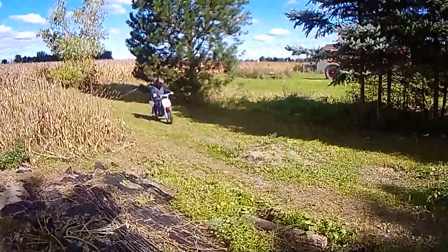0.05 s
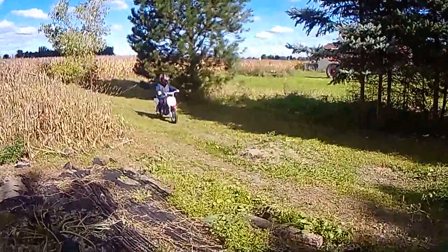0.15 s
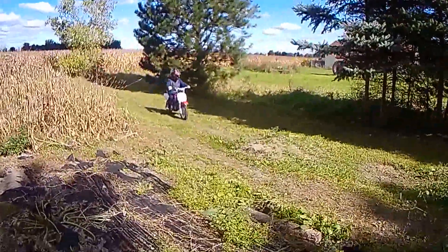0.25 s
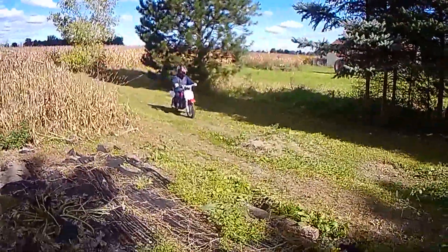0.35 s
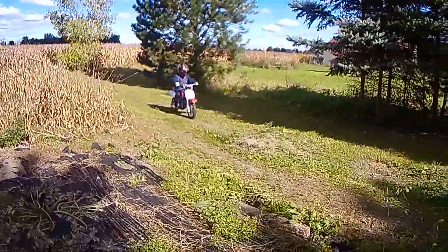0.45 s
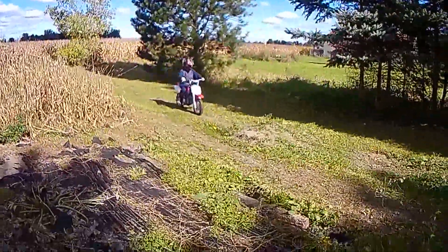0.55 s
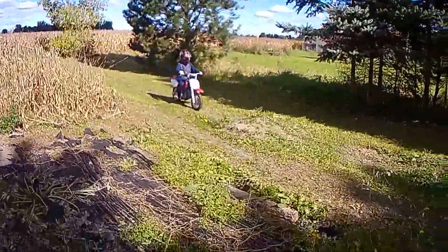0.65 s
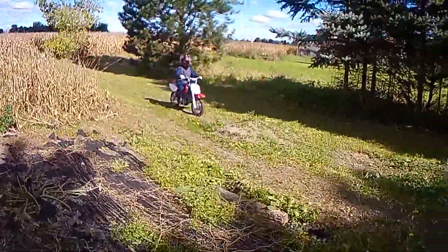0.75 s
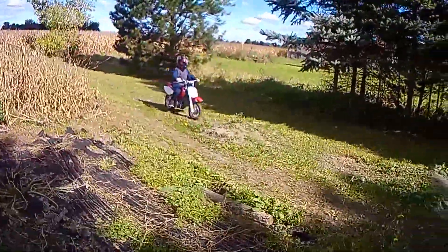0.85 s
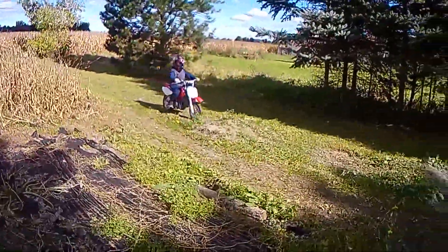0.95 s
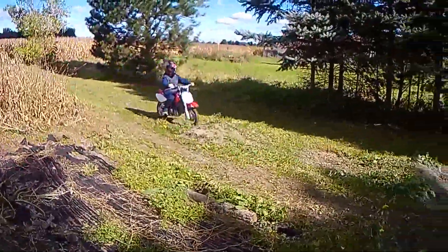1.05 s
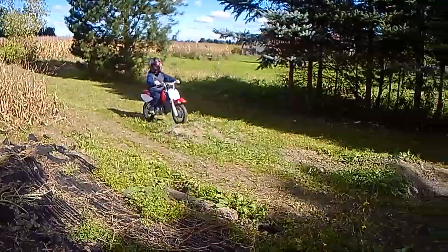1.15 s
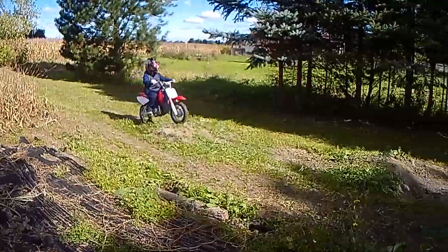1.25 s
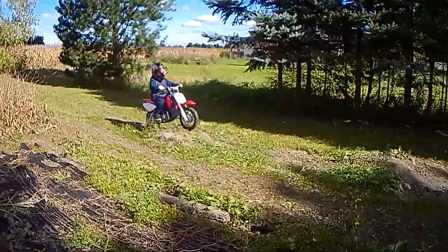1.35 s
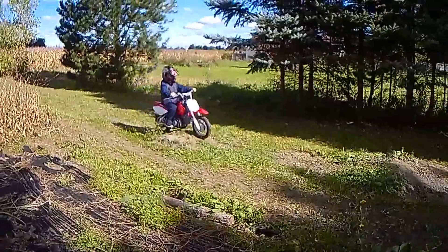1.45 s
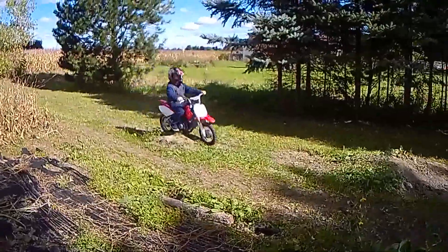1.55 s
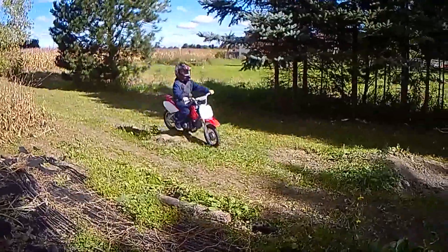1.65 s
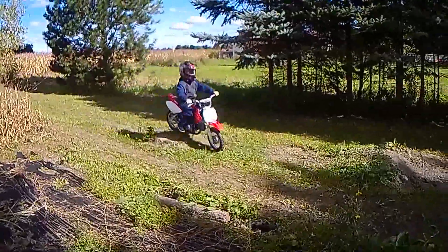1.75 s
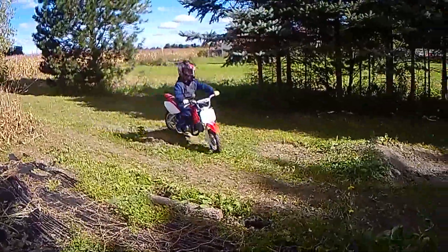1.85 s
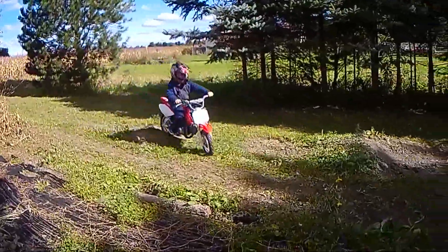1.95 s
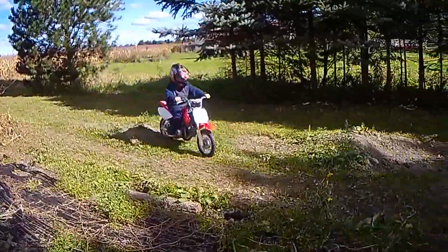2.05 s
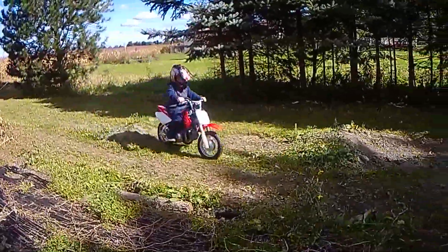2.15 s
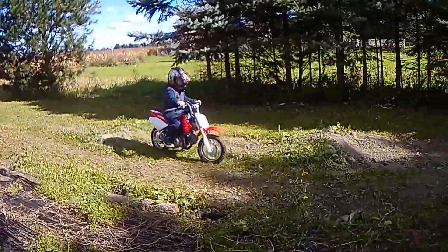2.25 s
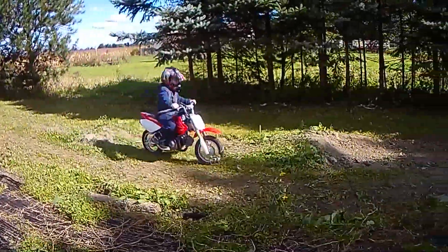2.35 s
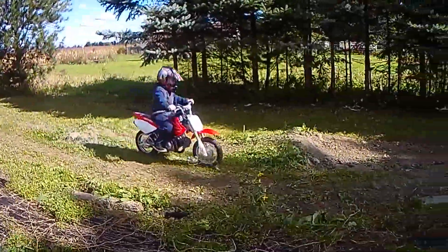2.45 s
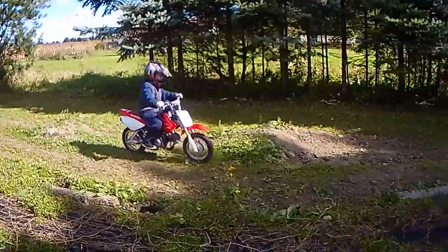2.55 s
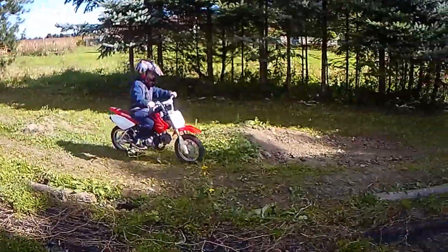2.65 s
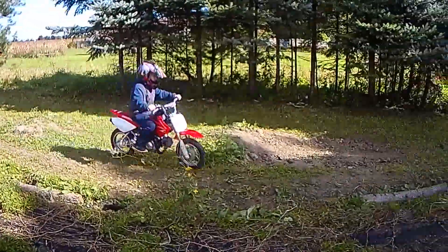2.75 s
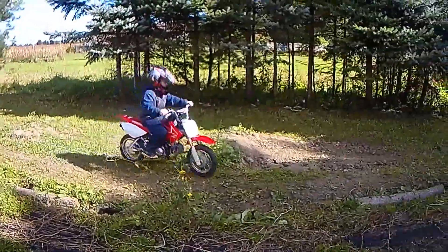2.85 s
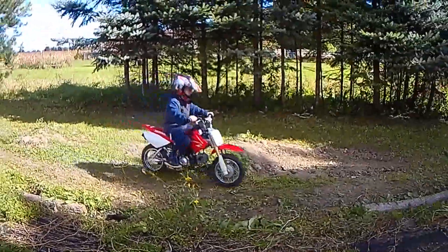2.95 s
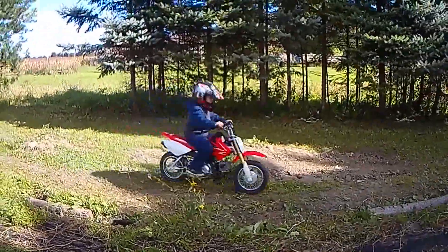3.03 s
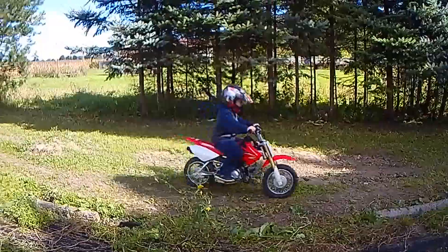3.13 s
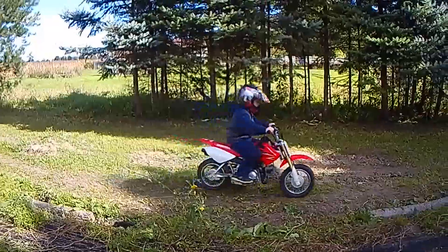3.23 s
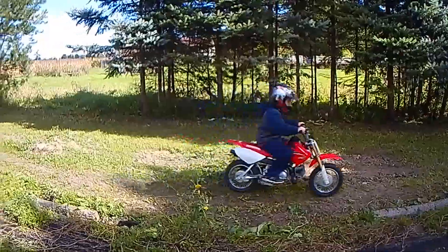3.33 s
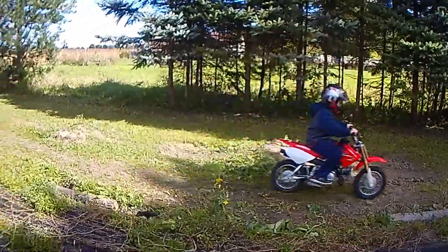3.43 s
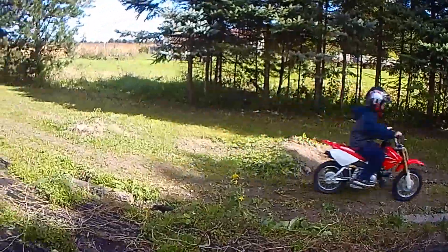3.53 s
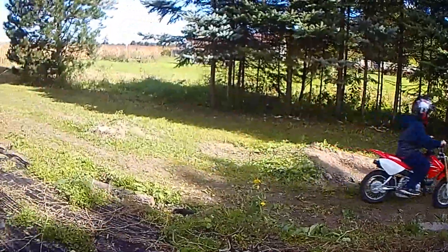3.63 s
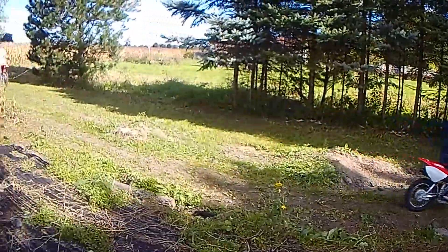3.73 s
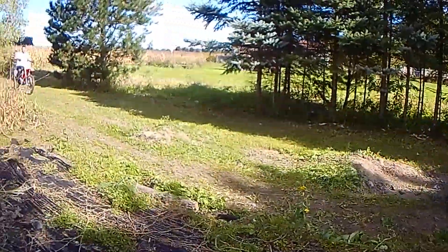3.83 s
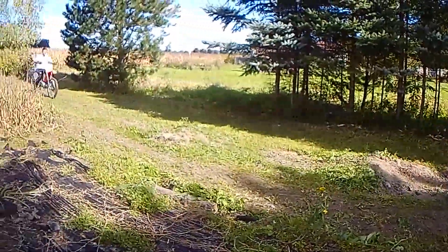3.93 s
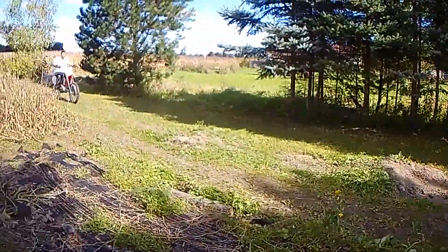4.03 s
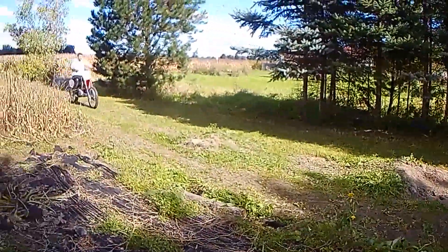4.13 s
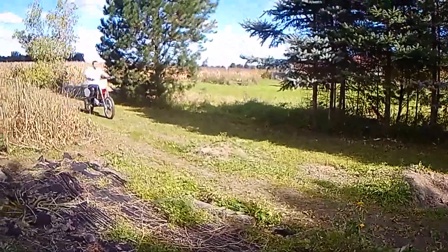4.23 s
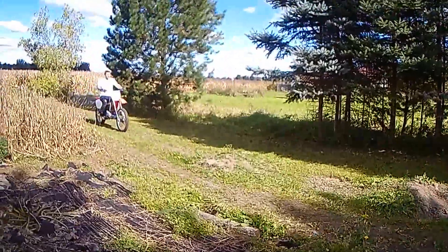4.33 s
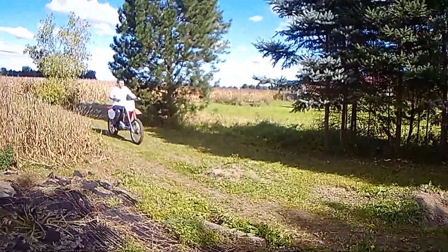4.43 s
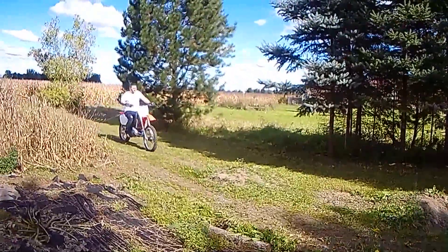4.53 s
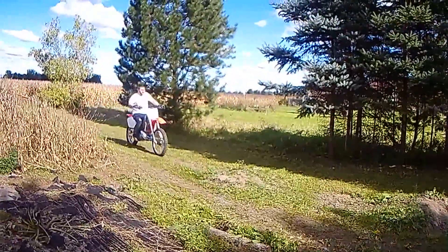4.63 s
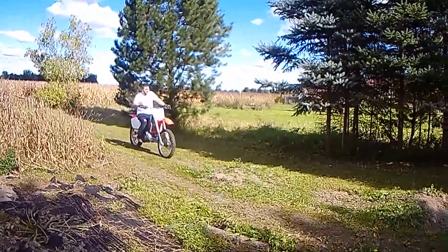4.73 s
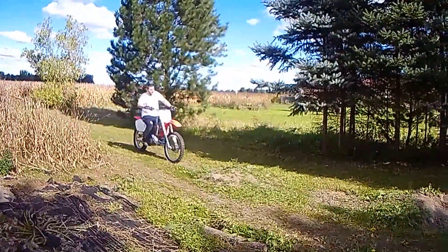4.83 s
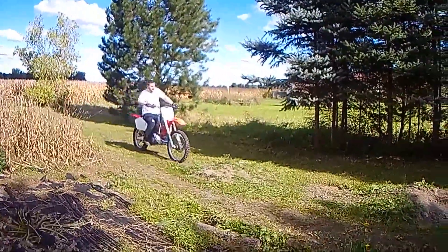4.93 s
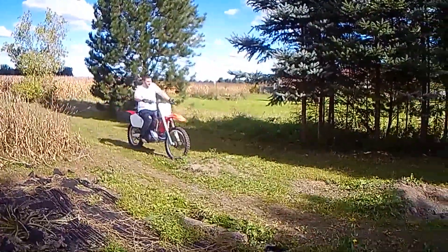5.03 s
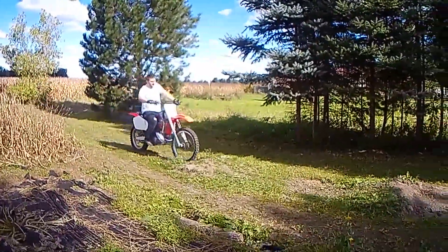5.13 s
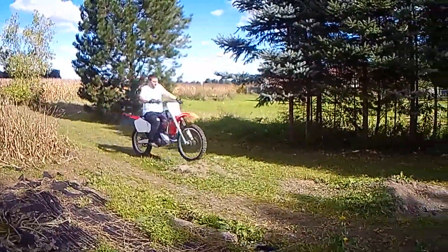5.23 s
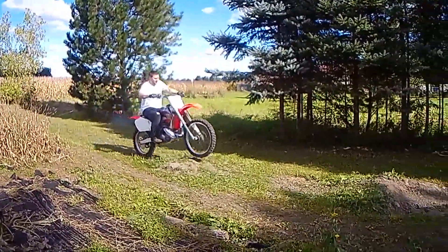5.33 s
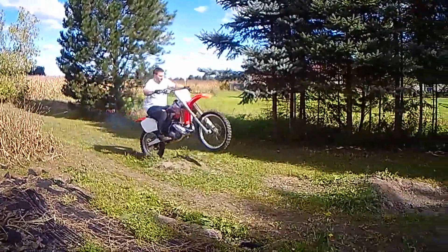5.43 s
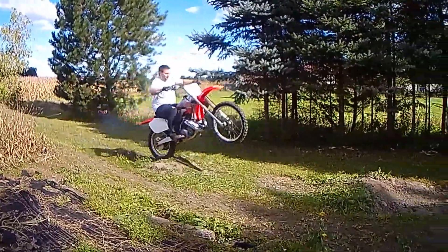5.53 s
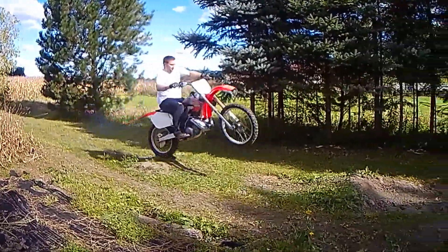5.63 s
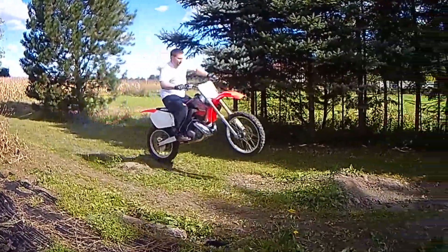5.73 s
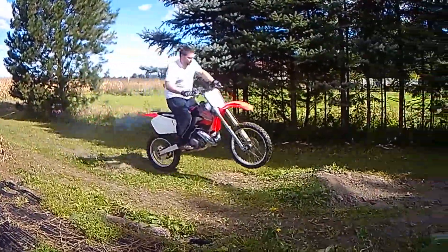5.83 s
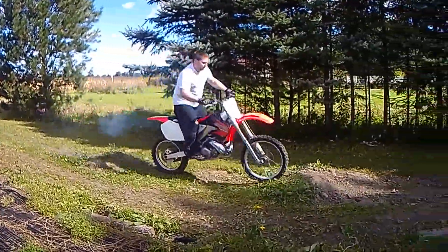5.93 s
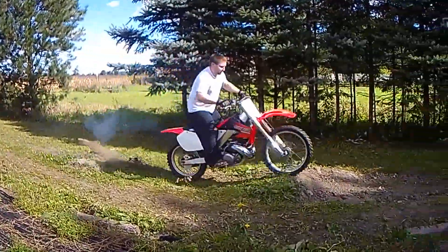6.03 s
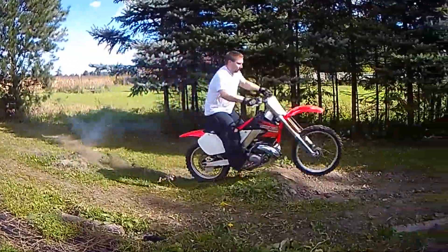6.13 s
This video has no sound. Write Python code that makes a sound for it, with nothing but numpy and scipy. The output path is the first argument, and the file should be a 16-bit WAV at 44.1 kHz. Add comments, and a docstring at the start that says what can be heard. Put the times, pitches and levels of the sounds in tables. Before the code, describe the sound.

Outdoors on grass, a distant two-stroke dirt bike burbles and sinks in pitch while a small four-stroke putters closer. Light ticks touch the microphone housing early on. The small bike passes with a soft low putt; then the two-stroke revs, approaches and gives two loud, ringing, raspy blips with a brief ragged drop between. A small camera microphone adds faint hiss and slight breeze; trees scatter the sound.

```python
"""A big two-stroke dirt bike burbles, comes close and is blipped twice, while a little four-stroke putters past.
Each engine is a train of impulses, one per firing, filtered into exhaust notes and gating bursts of gas noise.
Trees scatter both bikes, a finger ticks on the housing of a small camera, and a faint breeze blows on it.
The camera adds hiss, cuts one narrow and two broad notches and drops the extreme treble."""
import sys
import numpy as np
from scipy import signal
from scipy.fft import rfft, irfft, next_fast_len
from scipy.io import wavfile
from scipy.ndimage import uniform_filter1d, map_coordinates

SR = 44100
rng = np.random.default_rng(int(sys.argv[2]) if len(sys.argv) > 2 else 0)


def dump_mix(stems):
    """Bounce the given channels to the path in sys.argv[1] as a 16-bit WAV at rate SR."""
    frames = np.atleast_2d(stems).T  # one column per channel
    limited = np.clip(frames, -1, 1)  # hard clip at full scale
    pcm = np.round(limited * 32767).astype(np.int16)
    wavfile.write(sys.argv[1], SR, pcm)


N = 272538
T = np.arange(N) / SR  # time of each sample, s

# Big bike's engine speed. Each row: time in seconds, firings per second.
BIG_FIRING_RATE = [(0, 46.9), (.2, 51.2), (.6, 45.5), (1, 40), (1.6, 37), (2.3, 34.5), (3.1, 38), (3.3, 43),
                   (3.6, 65), (3.7, 54), (3.95, 56.5), (4.5, 48), (4.95, 48), (5.1, 50), (5.2, 57),
                   (5.25, 70), (5.31, 95.5), (5.35, 104), (5.39, 108), (5.425, 103), (5.46, 85), (5.5, 67),
                   (5.6, 47), (5.67, 40), (5.73, 50), (5.82, 69), (5.88, 92), (5.91, 102), (5.935, 101.5),
                   (5.97, 80.5), (6, 67.5), (6.06, 57.2), (6.12, 62), (6.18, 55)]
# Big bike's bark before stumbling. Each row: time in seconds, level in dB.
BIG_BARK_LEVEL = [(0, -43.5), (.08, -50.5), (.3, -51.5), (.75, -51), (.9, -63.5), (1.7, -54.5),
                  (2.3, -64.5), (2.75, -53.5), (3.02, -46.5), (3.5, -41), (3.58, -39.5), (3.63, -43),
                  (3.8, -47), (3.97, -34.5), (4.09, -35.5), (4.17, -39.5), (4.25, -40), (4.86, -40),
                  (4.93, -38.5), (4.95, -34), (5.02, -32), (5.12, -39), (5.14, -33), (5.22, -29),
                  (5.33, -17.5), (5.4, -14.5), (5.44, -13), (5.455, -21.5), (5.49, -19.5), (5.55, -32),
                  (5.675, -38), (5.69, -31), (5.8, -22.5), (5.85, -21), (5.91, -13.5), (6, -20.5),
                  (6.1, -20), (6.135, -18.5), (6.18, -23)]
# Big bike's low end before stumbling. Each row: time in seconds, low orders in dB, pipe note in dB.
BIG_LOW_LEVELS = [(0, -64, -63.5), (.27, -69, -58.5), (.75, -65, -71), (1.2, -67.5, -70.5), (2.4, -67, -65),
                  (3.02, -55.5, -59), (3.56, -51, -51.5), (3.7, -61, -57.5), (4.03, -50, -52.5),
                  (4.3, -56, -59), (4.9, -63, -56), (4.96, -47, -49), (5.12, -59.5, -52),
                  (5.23, -39.5, -51), (5.33, -36.5, -56), (5.39, -35, -37.5), (5.45, -52, -53),
                  (5.48, -37.5, -60), (5.55, -61, -54.5), (5.67, -51, -55), (5.76, -42.5, -34.5),
                  (5.91, -49.5, -35), (6, -37.5, -40.5), (6.1, -37, -54), (6.18, -32.5, -42)]
# Big throttle held open, firing cleanly. Each row: start in seconds, end in seconds, roughness 0-1.
BIG_OPEN_SPANS = [(-.1, .85, .1), (3.15, 3.62, .15), (3.87, 4.16, .25), (4.945, 5.07, .25),
                  (5.135, 5.2, .25), (5.2, 5.455, .04), (5.685, 5.75, .15), (5.75, 6.3, .1)]
# How squarely the big pipe faces the camera. Each row: time in seconds, facing 0-1.
BIG_FACING = [(0, .8), (1, .7), (1.4, .1), (4.6, .1), (5.25, 1), (5.5, 1), (5.8, .7), (5.92, .9),
              (6.05, .6)]
# Tone of the big exhaust's low end. Each row: frequency in Hz, relative gain in dB.
BIG_BOOM_TONE = [(24, -67), (40, -12.5), (108, -12.5), (144, -7.5), (177, -2.5), (261, 0.5), (301, 5),
                 (449, -22.5), (513, -6), (720, -27), (940, -25.5), (1580, -120)]
# Tone of the big pipe's note. Each row: frequency in Hz, relative gain in dB.
BIG_PIPE_TONE = [(160, -38.5), (270, -20.5), (296, -30), (327, 7.5), (381, 5.5), (470, -3), (610, -65),
                 (1030, -120)]
# Tone of the big pipe's roar, head on. Each row: frequency in Hz, relative gain in dB.
BIG_ROAR_AHEAD = [(350, -46.5), (600, -18.5), (761, -14), (836, -6.5), (946, -1), (1540, -11.5),
                  (1740, -15), (2100, -14.5), (2960, -39), (3310, -29.5), (3610, -40), (4490, -40),
                  (5800, -71.5), (7540, -81.5), (12800, -120)]
# Tone of the big pipe's roar, turned away. Each row: frequency in Hz, relative gain in dB.
BIG_ROAR_ASIDE = [(290, -45), (500, -21.5), (673, -39.5), (818, -13), (935, -16.5), (1210, -0.5),
                  (1580, -13.5), (2210, -21.5), (2980, -43.5), (3270, -45), (4010, -38), (5180, -46),
                  (5800, -47), (7540, -75), (12800, -120)]
# Pitched ring of the big tail pipe. Each row: frequency in Hz, relative gain in dB.
TAIL_PIPE_RING = [(350, -45), (520, -30), (650, -26), (780, -19), (860, -5), (930, 0), (990, -2),
                  (1070, -3), (1180, -5), (1280, -10), (1420, -8), (1550, -12), (1950, -20), (2600, -48)]
# Roar that stays gas noise even when the pipe rings in tune. Each row: frequency in Hz, gain in dB.
UPPER_ROAR = [(900, -24.5), (1900, -2.5), (16000, 5)]
# Sizzle of the gas jet and fins. Each row: frequency in Hz, relative gain in dB.
SIZZLE_TONE = [(2940, -20), (5000, -1.5), (5370, -0.5), (6120, -29.5), (7210, -17), (8050, -20),
               (8700, -7.5), (9860, -16), (11000, 0), (13000, -1), (15800, -8)]

# Little bike's engine speed. Each row: time in seconds, firings per second.
LITTLE_FIRING_RATE = [(0, 26.83), (.25, 25.48), (.375, 24.3), (.625, 23.7), (.875, 21.9), (1, 22),
                      (1.125, 20.2), (1.25, 22.5), (1.375, 22.5), (1.5, 21.2), (2, 19.4), (2.125, 20.2),
                      (2.25, 18.5), (2.5, 18.45), (2.625, 21.5), (2.75, 23.55), (3, 25.68), (3.6, 26.7),
                      (4, 28.2), (4.4, 31.2), (4.8, 33.7), (5.7, 35.05)]
# Little bike drawing near and passing.
# Each row: time in seconds, silencer note in dB, deep thud in dB, intake drone in dB.
LITTLE_LEVELS = [(0, -66, -65, -64), (.2, -60.5, -62.5, -62), (.85, -63.5, -62.5, -66.5),
                 (1.11, -59.5, -62, -64.5), (1.7, -57.5, -61.5, -63.5), (1.78, -61, -64.5, -63),
                 (2.4, -61, -64, -65.5), (2.48, -58.5, -58, -61), (2.73, -53, -60, -63),
                 (3.07, -49, -65, -71), (3.55, -47, -60, -67), (3.95, -46, -60, -61),
                 (4.36, -49.5, -63, -59), (4.85, -50, -67, -53.5), (5.15, -55.5, -73, -64.5),
                 (6.18, -51.5, -61, -77)]
# Little bike's valve gear. Each row: time in seconds, tick in dB, bright ping in dB.
VALVE_LEVELS = [(0, -106, -104), (3.9, -74.5, -78), (4.14, -65, -81), (4.22, -64.5, -80), (4.5, -76, -70.5),
                (4.8, -75, -76.5), (4.95, -86, -88), (6.18, -85, -90)]
# Little throttle held open. Each row: start in seconds, end in seconds, scatter of firing size in dB.
LITTLE_OPEN_SPANS = [(1.15, 1.75, 1.5), (2.45, 6.3, .6)]
# Deep end of the little exhaust. Each row: frequency in Hz, relative gain in dB.
THUD_TONE = [(18, -54.5), (30, -37.5), (59, -3.5), (75, 3), (125, 2), (160, -56.5), (280, -120)]
# Note of the little silencer. Each row: frequency in Hz, relative gain in dB.
SILENCER_TONE = [(56, -30.5), (95, -8), (150, 6.5), (166, 9), (200, -3.5), (216, -15.5), (260, -3),
                 (340, -43.5), (570, -120)]
# Drone of the little air box. Each row: frequency in Hz, relative gain in dB.
AIR_BOX_TONE = [(140, -35.5), (230, -4.5), (269, -17), (350, 12), (432, -54), (480, -22.5), (620, -54),
                (1060, -120)]
# Little exhaust's rasp through the housing. Each row: frequency in Hz, relative gain in dB.
RASP_TONE = [(350, -60.5), (600, -43.5), (887, -8.5), (1110, -12), (1230, 4.5), (1570, -8), (2170, -16.5),
             (2600, -21), (3000, -49.5), (3900, -79), (6600, -120)]
# Little drive train through the housing. Each row: frequency in Hz, relative gain in dB.
WHIRR_TONE = [(250, -27), (420, -31), (618, -19), (866, -6.5), (1120, -5.5), (1200, -24.5), (1320, -1.5),
              (1430, -1.5), (1650, -15.5), (2020, -8), (3000, -65), (3900, -60.5), (6600, -120)]
# Tick of the valve gear. Each row: frequency in Hz, relative gain in dB.
VALVE_TICK_TONE = [(3200, -40), (3550, -14), (3700, 0), (3930, -3), (4200, -20), (7000, -45), (9300, -28),
                   (10200, -14), (11000, -25), (12400, -22), (16000, -32)]
# Bright ping of the valve gear. Each row: frequency in Hz, relative gain in dB.
VALVE_PING_TONE = [(6000, -62), (9300, -18.5), (10200, 0.5), (11000, -11.5), (16000, -14.5)]

# Finger on the housing. Each row: time in seconds, level in dB before the lift and filter of each band,
# 60 dB decay of the body in seconds, time constant of the lead-in scrape in seconds, extra treble in dB.
FINGER_TAPS = [(0.2977, -33.5, 0.004, 0.0024, -19), (0.7012, -31, 0.011, 0.0054, -20),
               (0.721, -34.5, 0.009, 0.0051, -9), (0.7496, -26, 0.0083, .0003, -6.5)]
# Ring of the tapped housing. Each row: frequency in Hz, gain in dB.
HOUSING_TONE = [(600, -21), (1300, 9), (1600, 1.5), (2050, 6.5), (2700, -6.5), (3450, -1), (4500, -7),
                (6500, -14), (9000, -39)]
# Bright edge of a tap. Each row: frequency in Hz, gain in dB.
TAP_EDGE_TONE = [(5000, -57.5), (8000, -13.5), (11300, -4), (13200, -1.5), (16000, -2)]
# How slowly the scatter dies. Each row: frequency in Hz, time to fall 60 dB in seconds.
TREE_DECAY = [(100, 0.089), (1000, 0.064), (10000, 0.14)]
# Strength of the scatter. Each row: frequency in Hz, gain in dB.
TREE_TONE = [(100, -30), (500, -26.5), (1000, -21.5), (10000, -6)]
# Breeze on the housing. Each row: frequency in Hz, relative gain in dB.
BREEZE_TONE = [(8.8, -56), (15, -25.5), (41, 5), (55, 1.5), (72, -41.5), (120, -120)]
# Camera's own noise. Each row: frequency in Hz, relative gain in dB.
HISS_TONE = [(1470, -33), (2500, -3.5), (2830, -9), (3010, -14), (3510, -11.5), (4970, -14.5), (6070, -21),
             (8010, -18.5), (9570, -16.5), (15100, -9), (15800, -9.5)]
# Camera's notch filters. Each row: centre in Hz, width in Hz.
CAMERA_NOTCHES = [(3000, 254), (6030, 2200), (8000, 1700)]

TOP_HZ = 15760  # camera's band limit
THROTTLE_S = .012  # time to open or shut either throttle
SHUT_ROUGH, STUMBLE_DB = .7, 2  # big bike: roughness on a shut throttle, stumbling at roughness 1
SIZZLE_DB, SIZZLE_GROWS = -52, 0.9  # level at a -26 dB bark with no roughness, dB gained per dB of bark
SHUT_DULLS_DB = 14  # sizzle lost at roughness 1
GROUND_ECHO_S, GROUND_ECHO_DB = .00427, -12  # each pulse returns once off the ground, a few ms later
SPREAD_HZ, SPREAD_RAD = 160, 1.8  # random phase draws out each pulse: grain in frequency, depth
COASTING_DB = 3.2  # little bike: scatter of firing size on a shut throttle
RASP_DB, RASP_GROWS = -58, 0.72  # level at a -60 dB silencer note, dB gained per dB of it
RASP_WAVER_DB = -0.5
WHIRR_DB, WHIRR_GROWS = -53, 0.13  # level at a -61.5 dB silencer note, dB gained per dB of it


def big_bike():
    """Sharp port pulses ring the pipe, giving way to gas noise as the firing turns ragged."""
    hz, = curves(BIG_FIRING_RATE)
    rough = throttled(BIG_OPEN_SPANS, SHUT_ROUGH)
    stumble_db = STUMBLE_DB * rough * wobble(25)
    bark_db = curves(BIG_BARK_LEVEL)[0] + stumble_db
    boom_db, pipe_db = curves(BIG_LOW_LEVELS) + stumble_db
    sizzle_db = SIZZLE_DB + SIZZLE_GROWS * (bark_db + 26) - SHUT_DULLS_DB * rough
    facing = np.clip(curves(BIG_FACING)[0], 0, 1)
    fired = firings(hz, .1, .025 * rough, 5 * rough)

    low_gas = puffs(fired, .06, .8)
    boom = mix(.5 * rough, layer(low_gas, BIG_BOOM_TONE), layer(fired, BIG_BOOM_TONE))
    low_gas = puffs(fired, .06, .8)  # fresh noise for the pipe note
    pipe = mix(.7 * rough, layer(low_gas, BIG_PIPE_TONE), layer(fired, BIG_PIPE_TONE))

    ahead = layer(puffs(fired, 0.15, 0.18), BIG_ROAR_AHEAD)
    aside = layer(puffs(fired, 0.097, 0.32), BIG_ROAR_ASIDE)
    roar = mix(facing, ahead, aside)

    # the tail pipe rings in tune when it faces us, fires cleanly and revs above 52 firings a second
    in_tune = np.clip(.92 * facing - 1.2 * rough, 0, 1) * np.clip((hz - 52) / 20, 0, 1)
    ring = layer(spread(echoed(fired, GROUND_ECHO_S, GROUND_ECHO_DB)), TAIL_PIPE_RING)
    bark = mix(in_tune, ring + coloured(roar, UPPER_ROAR), roar)
    sizzle = layer(puffs(fired, 0.068, 0.33), SIZZLE_TONE)
    return amp(boom_db) * boom + amp(pipe_db) * pipe + amp(bark_db) * bark + amp(sizzle_db) * sizzle


def little_bike():
    """Each firing thumps through pipe, silencer and air box, with valve ticks, rasp and drive whirr."""
    hz, = curves(LITTLE_FIRING_RATE)
    thump_db, thud_db, drone_db = curves(LITTLE_LEVELS)
    tick_db, ping_db = curves(VALVE_LEVELS)
    rasp_db = RASP_DB + RASP_GROWS * (thump_db + 60) + RASP_WAVER_DB * wobble(16)
    whirr_db = WHIRR_DB + WHIRR_GROWS * (thump_db + 61.5)
    lumpy_db = throttled(LITTLE_OPEN_SPANS, COASTING_DB)
    fired = firings(hz, .27, .004 * lumpy_db, lumpy_db)

    thud = layer(fired + 0.0029 * puffs(fired, .1, .6), THUD_TONE)
    thump = layer(fired + .001 * puffs(fired, .1, 0.53), SILENCER_TONE)
    drone = layer(fired + 0.013 * puffs(fired, 0.3, 0.76), AIR_BOX_TONE)
    rasp = layer(puffs(echoed(fired, .008, -1), .03, .1), RASP_TONE)  # each firing rasps twice
    whirr = unit(coloured(rng.standard_normal(N), WHIRR_TONE))

    # valve strikes vary in strength from cycle to cycle
    tick_hits = fired * amp(3 * rng.standard_normal(N))
    tick = layer(tick_hits + 0.022 * puffs(fired, 0.041, .02), VALVE_TICK_TONE)
    ping_hits = fired * amp(3.2 * rng.standard_normal(N))
    ping = layer(puffs(ping_hits, .012, .02), VALVE_PING_TONE)

    exhaust = amp(thud_db) * thud + amp(thump_db) * thump + amp(rasp_db) * rasp
    valves = amp(tick_db) * tick + amp(ping_db) * ping
    return exhaust + amp(drone_db) * drone + amp(whirr_db) * whirr + valves


def taps():
    """Short noise ticks ring the housing, each led in by a brief rising scrape."""
    body, edge = np.zeros(N), np.zeros(N)
    t = np.arange(-SR // 20, SR // 20) / SR
    for s, db, t60, scrape_s, treble_db in FINGER_TAPS:
        envelope = np.where(t < 0, 0.51 * np.exp(t / scrape_s), amp(-60 * t / t60))
        tick = envelope * rng.standard_normal(len(t))
        first = round((s + t[0]) * SR)
        body[first:][:len(t)] += amp(db + 4.5) * tick
        # the treble dies twice as fast
        edge[first:][:len(t)] += amp(db + 10.0 + treble_db - 60 * np.maximum(t, 0) / t60) * tick
    return coloured(body, HOUSING_TONE) + coloured(edge, TAP_EDGE_TONE)


def trees(x):
    """Scatter from trunks and crop: a noise tail in which each frequency dies at its own speed."""
    hz, t, z = signal.stft(rng.standard_normal(SR // 2), SR, nperseg=256)
    fade = amp(-60 * t / along(TREE_DECAY, hz)[:, None])
    tail = signal.istft(z * fade, SR, nperseg=256)[1]
    late = np.pad(x, (500, 0))  # delay in samples
    return signal.fftconvolve(late, tail / np.linalg.norm(tail))[:N]


def breeze():
    """Moving air on the housing: steady noise confined to the deep bass."""
    return amp(-90) * unit(coloured(rng.standard_normal(N), BREEZE_TONE))


def camera_hiss():
    """Steady electronic noise, shaped to the camera's own tone."""
    return amp(-67.5) * unit(coloured(rng.standard_normal(N), HISS_TONE))


def firings(rate, start, jitter, scatter_db):
    """One impulse per cycle, a little early or late and of uneven size."""
    turns = start + np.cumsum(rate) / SR
    at = np.flatnonzero(np.diff(np.floor(turns)))
    chance = rng.standard_normal((1000, 2))[:len(at)]
    size = amp(scatter_db[at] * chance[:, 0])
    shift = jitter[at] * chance[:, 1] * SR / rate[at]  # jitter is a fraction of a cycle
    at = np.clip(at + shift, 0, N - 1).astype(int)
    return np.bincount(at, size, N)


def puffs(fired, t60, between):
    """Gas noise that bursts at each firing and never quite stops between."""
    gate = signal.lfilter([1], [1, -amp(-60 / (t60 * SR))], fired)
    return (unit(gate) + between) * rng.standard_normal(N)


def throttled(spans, shut):
    """The value of each open span, the shut value elsewhere, with soft changes."""
    value = np.full(N, float(shut))
    for start, end, held in spans:
        value[(T >= start) & (T < end)] = held
    return uniform_filter1d(value, size=round(THROTTLE_S * SR))


def echoed(x, delay, db):
    """x with one later copy."""
    return x + amp(db) * np.pad(x, (round(delay * SR), 0))[:N]


def spread(x):
    """Each pulse drawn out by smooth random phase over frequency, gain unchanged."""
    size = next_fast_len(N + SR)
    knot = np.fft.rfftfreq(size, 1 / SR) / SPREAD_HZ
    phase = map_coordinates(rng.standard_normal(int(knot[-1]) + 4), [knot])
    return irfft(rfft(x, size) * np.exp(1j * SPREAD_RAD * phase), size)[:N]


def wobble(rate):
    """A smooth random curve, rate knots a second."""
    return map_coordinates(rng.standard_normal(int(N * rate / SR) + 4), [T * rate])


def coloured(x, points):
    """x through the causal minimum-phase filter with this (Hz, dB) gain."""
    size = 16384
    gain = amp(along(points, np.fft.rfftfreq(size, 1 / SR)))
    cep = irfft(np.log(gain + 1e-6))
    cep[1:size // 2] *= 2  # fold the cepstrum so the response starts at time zero
    cep[size // 2 + 1:] = 0
    response = irfft(np.exp(rfft(cep)))[:size // 2]
    return signal.fftconvolve(x, response)[:N]


def layer(x, points):
    """x filtered to a tone and held at an even level."""
    return steady(coloured(x, points))


def mix(share, a, b):
    """Equal-power blend: share of a, the rest b."""
    return np.sqrt(share) * a + np.sqrt(1 - share) * b


def steady(x):
    """x held near rms 1 throughout, whatever the firing rate."""
    power = uniform_filter1d(uniform_filter1d(x ** 2, size=6000), size=6000)
    return x / np.sqrt(np.abs(power) + 1e-20)


def unit(x):
    """x scaled to an overall rms of 1."""
    return x / np.sqrt(np.mean(x ** 2) + 1e-20)


def amp(db):
    """Decibels to linear gain."""
    return 10 ** (np.asarray(db) / 20)


def along(points, hz):
    """(Hz, value) points read on a log frequency axis."""
    f, v = np.transpose(points)
    return np.interp(np.log(hz + 1), np.log(f + 1), v)


def curves(rows):
    """One value per sample for each column after the time."""
    s, *cols = np.transpose(rows)
    return [np.interp(T, s, c) for c in cols]


def scene():
    """Both bikes, their scatter from the trees, the finger taps and the breeze, in mono."""
    bikes = big_bike() + little_bike()
    scatter = trees(coloured(bikes, TREE_TONE))
    return (bikes + scatter + taps() + breeze())[None]


def record(dry):
    """The camera adds hiss, notches one narrow and two broad bands and keeps nothing above its band limit."""
    x = dry + camera_hiss()
    size = next_fast_len(N + SR // 2)
    f = np.fft.rfftfreq(size, 1 / SR)
    notches = [(c * c - f * f) / (c * c - f * f + 1j * f * w) for c, w in CAMERA_NOTCHES]
    gain = np.prod(notches, axis=0) * (f < TOP_HZ)
    return irfft(rfft(x, size) * gain, size)[:, :N]


dry = scene()
out = record(dry)
dump_mix(out)
```